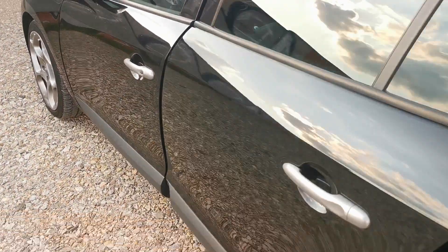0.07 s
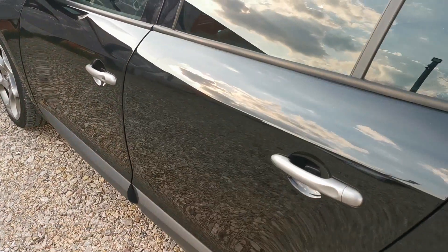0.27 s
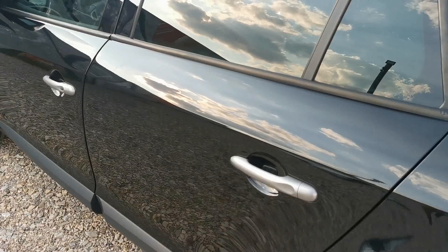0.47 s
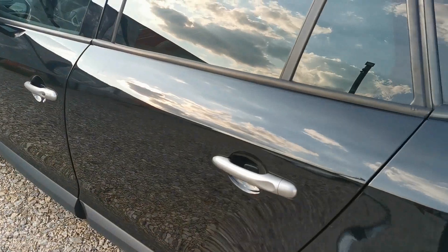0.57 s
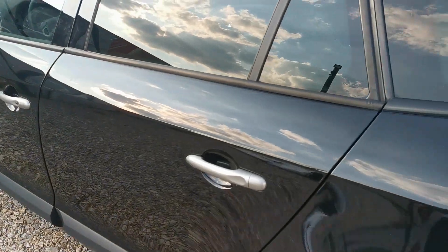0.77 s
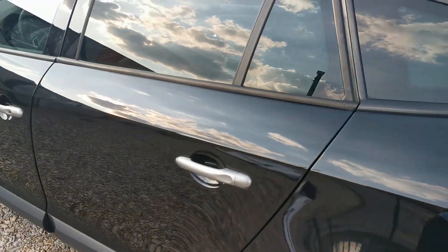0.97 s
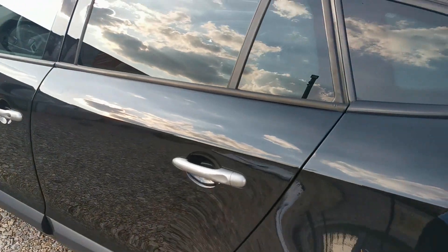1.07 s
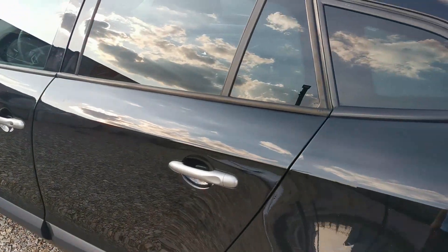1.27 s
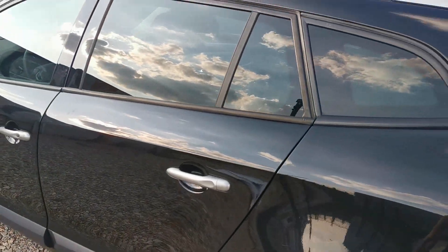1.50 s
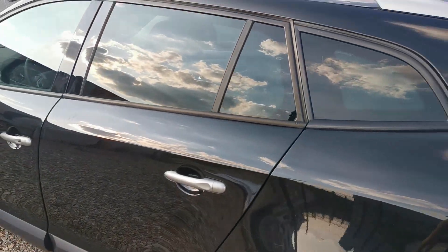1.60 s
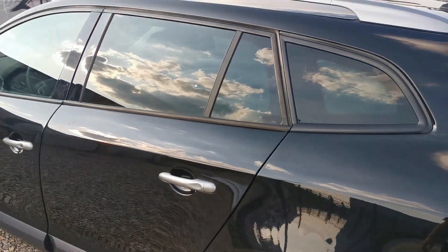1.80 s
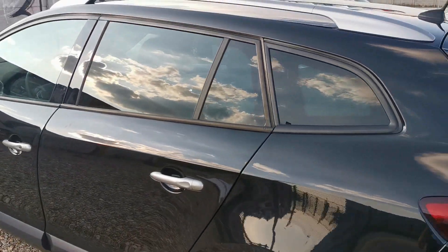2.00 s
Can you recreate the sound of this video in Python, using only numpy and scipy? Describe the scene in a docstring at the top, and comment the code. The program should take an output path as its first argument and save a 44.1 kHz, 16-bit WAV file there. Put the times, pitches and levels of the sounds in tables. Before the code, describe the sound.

A car door shuts close by with a solid latch clunk, deep thud and brief rattle.

```python
"""A car's rear door is pushed shut an arm's length away, outdoors on gravel.
The latch strikes first; then the door seats, the cabin booms, the panels ring and the lock and trim rattle.
Air puffs come before it; light clicks, soft scuffs and a faint squeak follow. Beneath lie a machine's hum
and thin whine, low rumble and wind. Impacts are shaped noise bursts and decaying sines; the beds are
coloured noise and wavering tones."""
import sys
import numpy as np
from scipy import signal
from scipy.fft import rfft, irfft, next_fast_len
from scipy.io import wavfile
from scipy.ndimage import uniform_filter1d

SR = 44100
rng = np.random.default_rng(int(sys.argv[2]) if len(sys.argv) > 2 else 0)


def transcribe(u):
    """Save the signal u as a 16-bit wav file named by the first command-line argument.

    u: samples, shape (n,) or (channels, n), limited to [-1, 1]; the rate is SR.
    q: integer samples, one column per channel.
    """
    v = np.clip(np.atleast_2d(u).T, -1, 1)
    q = np.round(v * 32767).astype(np.int16)
    wavfile.write(sys.argv[1], SR, q)


N = 90404  # samples in the scene


def undb(db):
    """Decibels to gain."""
    return 10 ** (np.asarray(db) / 20)


def clock():
    """Time of every sample, in seconds."""
    return np.arange(N) / SR


def over_hz(points, hz):
    """Read (f/Hz, value) points on a log frequency axis."""
    f, v = np.array(points, float).T
    return np.interp(np.log(np.maximum(hz, 1)), np.log(f), v)


def over_time(points, axis=1):
    """Read one column of a control curve at every sample."""
    p = np.array(points, float)
    return np.interp(clock(), p[:, 0], p[:, axis])


def bins(n):
    """Frequencies of an n-sample spectrum, in Hz."""
    return np.arange(n // 2 + 1) * SR / n


def fade(t, t60):
    """Exponential decay, 60 dB in t60 seconds."""
    return np.exp(-np.log(1000) * t / t60)


def swell(t, centre, width):
    """Bell-shaped rise and fall around a moment, peaking at 1."""
    return np.exp(-.5 * ((t - centre) / width) ** 2)


def at(x, s):
    """The sound x starting at s seconds, in a track of full length."""
    k = int(s * SR)
    return np.pad(x, [(0, 0)] * (x.ndim - 1) + [(k, N)])[..., :N]


def walk(rate):
    """Smoothed random drift with a spread near 1, drawing rate new values a second."""
    k = int(SR / rate)
    steps = np.repeat(rng.standard_normal(256), k)[:N]
    return 1.3 * uniform_filter1d(uniform_filter1d(steps, k), k)


GRAIN_S = 0.0008  # length of one noise grain


def noise(spectrum, side_db, size=N, grain_db=0):
    """Stereo noise of rms 1 with a given colour and width, optionally broken into grains."""
    n = next_fast_len(size, True)
    f = bins(n)
    grain_index = (np.arange(n) / max(GRAIN_S * SR, 1)).astype(int)
    grains = rng.standard_normal(n)[grain_index]
    mid, side = rfft(rng.standard_normal((2, n)) * undb(grain_db * grains))
    width = undb(over_hz(side_db, f))
    stereo = (mid + np.array([[1], [-1]]) * width * side) / np.hypot(1, width)
    colour = undb(over_hz(spectrum, f)) * (f > 10)
    x = irfft(stereo * colour, n)[:, :size]
    return x / x.std()


# stereo width of the near sounds: f/Hz, side against mid/dB
NEAR_WIDTH = [(60, -12), (250, -14), (600, -2.5), (1300, -1)]
BURST_ATTACK_S = 0.0005


def burst(spectrum, t60, grain_db=0, size=32768):
    """A struck body with countless modes: each octave dies at its own rate."""
    t = np.arange(size) / SR
    octave = np.log2(np.clip(bins(size), 32, 16384))
    x = rfft(noise(spectrum, NEAR_WIDTH, size, grain_db))
    out = 0
    for k in range(5, 15):  # overlapping octave bands, 32 Hz to 16384 Hz
        band = irfft(x * np.maximum(1 - abs(octave - k), 0))
        out = out + band * fade(t, over_hz(t60, 2. ** k))
    return out * (1 - np.exp(-t / BURST_ATTACK_S))


SOFT_ATTACK_S, HARD_ATTACK_S = 0.001, 0.0006  # rubber seal; bare metal or plastic


def ring(modes, attack=SOFT_ATTACK_S, size=32768):
    """Decaying sines from (f/Hz, level/dB, t60/s) rows, set going by a contact of some softness."""
    t = np.arange(size) / SR
    tones = sum(undb(db) * np.sin(2 * np.pi * hz * t) * fade(t, t60) for hz, db, t60 in modes)
    return (1 - np.exp(-t / attack)) * tones


def hits(table, spectrum, t60, grain_db=0):
    """One fresh noise burst for each (t/s, level/dB) row."""
    return sum(at(undb(db) * burst(spectrum, t60, grain_db), s) for s, db in table)


def strike(table, modes, scatter_db, attack):
    """Each (t/s, level/dB) row rings the same modes, in a balance that varies by blow and by side."""
    tones = np.array([ring([mode], attack) for mode in modes])
    balance = undb(scatter_db * rng.standard_normal((len(table), 2, len(modes))))
    return sum(at(undb(db) * (gains @ tones), s) for (s, db), gains in zip(table, balance))


# stereo width of the far sounds: f/Hz, side against mid/dB
FAR_WIDTH = [(40, -3.5), (130, -9.5), (300, -8), (650, 5.5), (12000, -6)]
# colour of the rumble: f/Hz, relative level/dB per Hz
RUMBLE_COLOUR = [(45, -2), (210, -4), (250, -10.5), (330, -12), (430, -18), (1300, -23), (2400, -27.5),
                 (3100, -38), (6700, -45.5), (8000, -55.5), (11000, -52.5), (15500, -62)]
# fader for the rumble: t/s, level/dB
RUMBLE_FADER = [(0.18, -36), (0.5, -40.5), (1.1, -40.5), (1.5, -39)]


def rumble():
    """Far traffic: wide, low-weighted noise at a slowly moving level."""
    return noise(RUMBLE_COLOUR, FAR_WIDTH) * undb(over_time(RUMBLE_FADER))


# colour of the wind: f/Hz, relative level/dB per Hz
WIND_COLOUR = [(50, 15.5), (90, 16.5), (300, -28), (1500, -58)]
# fader for the wind: t/s, level/dB
WIND_FADER = [(0.1, -37.5), (0.6, -37.5), (1.05, -55), (1.6, -43.5)]


def wind():
    """Light wind on the microphone: very low noise that dips and returns."""
    return noise(WIND_COLOUR, FAR_WIDTH) * undb(over_time(WIND_FADER))


def turn(hz):
    """Phase of a tone whose pitch moves."""
    return 2 * np.pi * np.cumsum(hz) / SR


# notes of the hum, each swelling in its own time: t/s of the swell, f/Hz, relative level/dB, swell/dB
HUM_NOTES = [(0.6, 97.36, -49, 7), (1.33, 134.6, -48.5, 10.5), (2.0, 198.8, -50, 11)]
HUM_SWELL_S, HUM_WAVER_DB = 0.049, -1.5
HUM_DRIFT = 0.013  # pitch drift, as a fraction


def hum():
    """A distant machine's low notes, wavering in pitch and level, each with one brief swell."""
    out = 0
    for s, hz, db, swell_db in HUM_NOTES:
        level = db + swell_db * swell(clock(), s, HUM_SWELL_S) + HUM_WAVER_DB * walk(7.6)
        out = out + undb(level) * np.sin(turn(hz * (1 + HUM_DRIFT * walk(13.8))))
    return out


# path of the whine: t/s, f/Hz, relative level/dB
WHINE_PATH = [(0.55, 640, -69.5), (0.66, 646, -60), (0.93, 648, -57.5), (1.16, 650, -70), (1.22, 654, -57),
              (1.28, 654, -60.5), (1.44, 655, -56), (1.56, 660, -59), (1.63, 662, -64), (1.76, 667, -63.5),
              (1.92, 665, -56.5), (2.05, 660, -70)]
WHINE_OCTAVE_DB, WHINE_FLUTTER_DB = -7, 3
WHINE_WAVER = 0.004  # pitch waver, as a fraction


def whine():
    """The machine's thin tone and its octave creep upward, then ease; each side flutters separately."""
    phase = turn(over_time(WHINE_PATH) * (1 + WHINE_WAVER * walk(29.73)))
    sides = []
    for _ in range(2):
        level = undb(over_time(WHINE_PATH, axis=2) + WHINE_FLUTTER_DB * walk(22.55))
        tone = np.sin(phase + .5 * walk(9.56))
        octave = undb(WHINE_OCTAVE_DB) * np.sin(2 * phase + walk(32))
        sides.append(level * (tone + octave))
    return np.array(sides)


def machine():
    """A distant machine: hum and whine together, raised 3 dB."""
    return np.sqrt(2) * (hum() + whine())


# colour of the squeak: f/Hz, relative level/dB per Hz
SQUEAK_COLOUR = [(2500, -29), (3000, 6), (3300, -10), (3650, 4), (4100, -38)]
SQUEAK_S, SQUEAK_DB, SQUEAK_T60_S = 1.407, -52, 0.2


def squeak():
    """One faint squeak: narrow noise bands dying away."""
    tone = noise(SQUEAK_COLOUR, FAR_WIDTH) * fade(clock(), SQUEAK_T60_S)
    return at(undb(SQUEAK_DB) * tone, SQUEAK_S)


# colour of the grit: f/Hz, relative level/dB per Hz
GRIT_COLOUR = [(2000, 8.5), (5000, 4), (15000, -14)]


def grit():
    """Grainy bright noise."""
    return noise(GRIT_COLOUR, NEAR_WIDTH, grain_db=4)


# grit shifting underfoot: t/s of the peak, level/dB, width of the swell/s
SCUFF_CUES = [(0.731, -62, 0.0034), (0.876, -59, 0.0046), (1.486, -58.5, 0.031), (1.753, -58.5, 0.012)]


def scuffs():
    """Grit shifting underfoot: grainy noise opened by short soft swells."""
    return grit() * sum(undb(db) * swell(clock(), s, width) for s, db, width in SCUFF_CUES)


# light clicks: t/s, level/dB
CLICK_CUES = [(0.8378, -37), (1.6697, -28), (1.6729, -42)]
# modes of a click: f/Hz, relative level/dB, t60/s
CLICK_MODES = [(903, -3, 0.013), (1180, -3, 0.013), (1520, -5, 0.014)]
TICK_DB, TICK_T60_S = -16, 0.014  # bright noise on each click, against its modes


def clicks():
    """Light clicks: three short modes under a tick of bright noise."""
    out = 0
    for s, db in CLICK_CUES:
        tick = undb(TICK_DB) * grit() * fade(clock(), TICK_T60_S)
        out = out + at(undb(db) * (ring(CLICK_MODES, HARD_ATTACK_S, size=N) + tick), s)
    return out


# air buffets as the door swings: t/s, level/dB
PUFF_CUES = [(0.1776, -8), (0.196, -11.5)]
PUFF_HZ, PUFF_T60_S, PUFF_RIGHT_DB = 122.5, 0.04, -35


def puffs():
    """Air from the swinging door buffets the microphone: soft low bumps, mostly on the left port."""
    bumps = sum(at(ring([(PUFF_HZ, db, PUFF_T60_S)]), s) for s, db in PUFF_CUES)
    return bumps * undb([[0], [PUFF_RIGHT_DB]])


SHUT_S = 0.2474  # when the door seats
# decay of the yard: f/Hz, t60/s
YARD_DECAY = [(100, 0.97), (5000, 0.26)]
YARD_DB = -37


def yard():
    """A faint return from the yard: one burst in the thud's colour with its own decay."""
    return hits([(SHUT_S, YARD_DB)], THUD_COLOUR, YARD_DECAY)


# lock and trim clatter: t/s, level/dB
RATTLE_CUES = [(0.2462, -25.5), (0.2512, -23.5), (0.2572, -28.5), (0.2632, -37), (0.2684, -30.5),
               (0.2795, -31.5), (0.2995, -39.5), (0.3215, -42), (0.3645, -48.5), (0.394, -59)]
# colour of the clatter: f/Hz, relative level/dB per Hz
CLATTER_COLOUR = [(300, 7.5), (800, 0), (2500, 3), (3500, -5.5), (5000, -2), (6200, -10.5), (7500, -7),
                  (10500, -12.5), (15500, -24)]
# decay of the clatter: f/Hz, t60/s
CLATTER_DECAY = [(500, 0.21), (3000, 0.15), (12000, 0.077)]
# tones of the lock: f/Hz, relative level/dB
LOCK_TONES = [(1610, -14.5), (2040, -20), (2177, -25), (2307, -26), (5975, -27), (7127, -27)]
CLATTER_GRAIN_DB, LOCK_T60_S, LOCK_SCATTER_DB = 3, 0.13, 8.5


def lock_and_trim():
    """Loose lock and trim rattle: grainy bursts with hard, uneven ringing tones."""
    modes = [(hz, db, LOCK_T60_S) for hz, db in LOCK_TONES]
    clatter = hits(RATTLE_CUES, CLATTER_COLOUR, CLATTER_DECAY, CLATTER_GRAIN_DB)
    return clatter + strike(RATTLE_CUES, modes, LOCK_SCATTER_DB, HARD_ATTACK_S)


# air modes of the cabin: f/Hz, level/dB, t60/s
BOOM_MODES = [(39.7, -16, 0.48), (62.9, -9.5, 0.4), (81, -19.5, 0.43)]
SWING_HZ, SWING_DB, SWING_T60_S, SWING_LAG_S = 22.4, -10, 0.54, 0.0016


def cabin():
    """Cabin air booms in low modes; the slowest swing starts negative, as suction."""
    swing = ring([(SWING_HZ, SWING_DB, SWING_T60_S)])
    return at(ring(BOOM_MODES), SHUT_S) - at(swing, SHUT_S + SWING_LAG_S)


# modes of the door skin and glass: f/Hz, relative level/dB, t60/s
PANEL_MODES = [(172, -17, 0.148), (226.7, -16, 0.42), (246.4, -20, 0.3), (307.4, -24.5, 0.42),
               (363.6, -21, 0.23), (418, -22, 0.08), (510, -29, 0.3), (558, -31, 0.3), (647, -30, 0.25),
               (788, -34, 0.3), (1127, -37, 0.27), (1228, -37, 0.27), (1350, -39, 0.25)]
PANEL_SCATTER_DB = 0  # every blow rings the same balance


def panels():
    """Door skin and glass ring at every blow, softened by the rubber seal."""
    return strike(BLOW_CUES, PANEL_MODES, PANEL_SCATTER_DB, SOFT_ATTACK_S)


# the door's edges meet the seal one after another, then it rebounds: t/s, relative level/dB
BLOW_CUES = [(0.2473, -2), (0.2529, -2), (0.268, -1), (0.2817, -21), (0.3085, -13)]
# colour of the thud: f/Hz, relative level/dB per Hz
THUD_COLOUR = [(40, 2.5), (280, 5.5), (500, -5), (900, -9.5), (2500, -20.5), (15000, -36)]
# decay of the thud: f/Hz, t60/s
THUD_DECAY = [(60, 0.74), (250, 0.72), (700, 0.57), (2000, 0.42), (8000, 0.17)]
THUD_DB = -23
SMACK_DB, SMACK_S = -11, 0.0012  # peak level and rise time of the pressure pulse


def thud():
    """The door seats: each blow is a one-sided pressure pulse and a dull noise burst."""
    t = clock()
    smack = undb(SMACK_DB) * t / SMACK_S * np.exp(1 - t / SMACK_S)
    pulses = sum(at(undb(db) * smack, s) for s, db in BLOW_CUES)
    return pulses + undb(THUD_DB) * hits(BLOW_CUES, THUD_COLOUR, THUD_DECAY)


# latch meets striker: t/s, level/dB
LATCH_CUES = [(0.2290, -14), (0.2322, -15)]
# colour of the latch: f/Hz, relative level/dB per Hz
LATCH_COLOUR = [(120, -16), (400, 8), (800, 2.5), (1100, -4.5), (2200, -9), (3300, -18.5), (6500, -22),
                (8500, -35), (11000, -29), (15500, -47)]
# decay of the latch: f/Hz, t60/s
LATCH_DECAY = [(250, 0.061), (1500, 0.094)]
# modes of the striker and door frame: f/Hz, level/dB, t60/s
STRIKER_MODES = [(270.3, -14.5, 0.18), (661, -19, 0.07), (830, -23.5, 0.017), (1230, -19.5, 0.091),
                 (1540, -23, 0.042)]
STRIKER_SCATTER_DB = 4.5


def latch():
    """Latch meets striker: two noise bursts, the first also ringing the striker and frame."""
    first_hit = [(LATCH_CUES[0][0], 0)]
    metal = strike(first_hit, STRIKER_MODES, STRIKER_SCATTER_DB, HARD_ATTACK_S)
    return hits(LATCH_CUES, LATCH_COLOUR, LATCH_DECAY) + metal


def door():
    """The shutting door: latch, thud, panels, cabin air and clatter, with the yard's return."""
    return latch() + thud() + panels() + cabin() + lock_and_trim() + yard()


def scene():
    """The door and its surroundings."""
    background = rumble() + wind() + machine()
    small_sounds = squeak() + scuffs() + clicks()
    return background + small_sounds + puffs() + door()


# colour of the two microphone ports: f/Hz, left minus right/dB
PORT_COLOUR = [(60, 1), (220, 1.2), (380, -0.5), (700, -7), (1290, 1), (2380, -6), (3800, 1), (5500, 0),
               (7600, 6), (10700, -5), (15000, 0)]
TOP_HZ = 15800


def record(dry):
    """Each port colours the sound its own way; peaks stop at full scale and the top is cut."""
    n = next_fast_len(N + 4096, True)
    # half the difference goes to each side
    ports = undb(np.array([[.5], [-.5]]) * over_hz(PORT_COLOUR, bins(n)))
    x = np.clip(irfft(rfft(dry, n) * ports, n)[:, :N], -1, 1)
    top_cut = signal.ellip(10, .2, 70, TOP_HZ, fs=SR, output="sos")
    return signal.sosfilt(top_cut, x)


dry = scene()
out = record(dry)
transcribe(out)
```